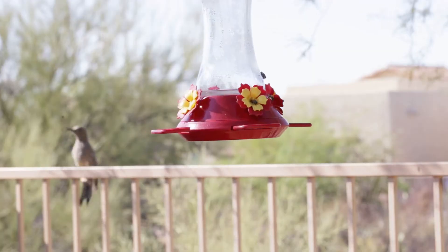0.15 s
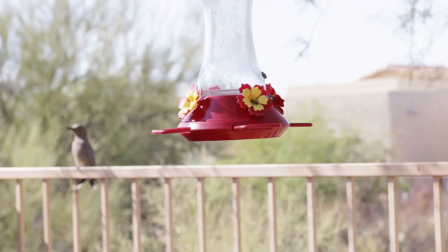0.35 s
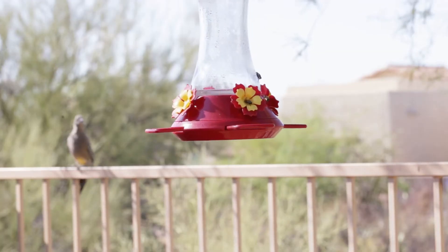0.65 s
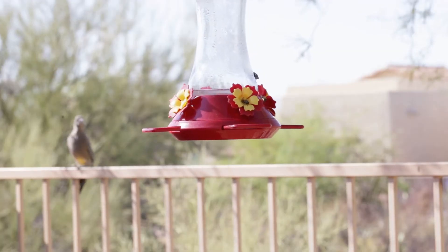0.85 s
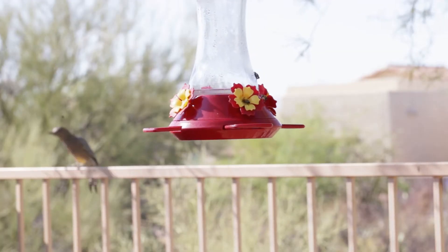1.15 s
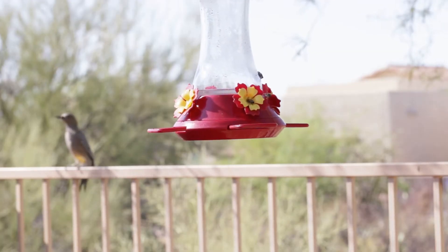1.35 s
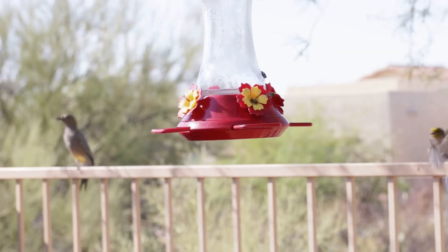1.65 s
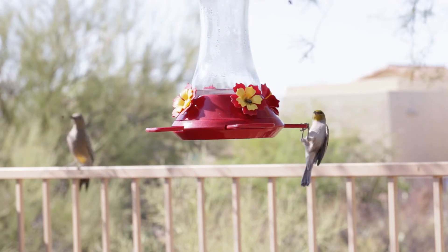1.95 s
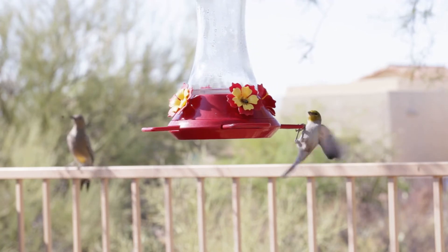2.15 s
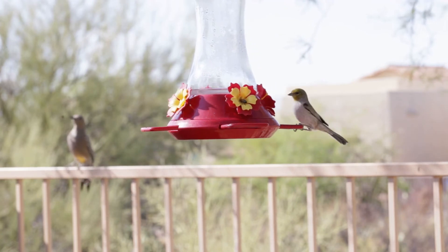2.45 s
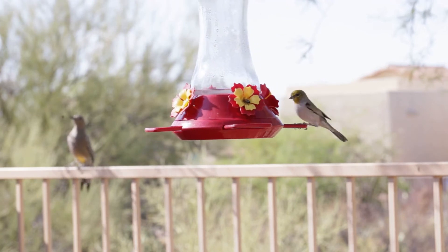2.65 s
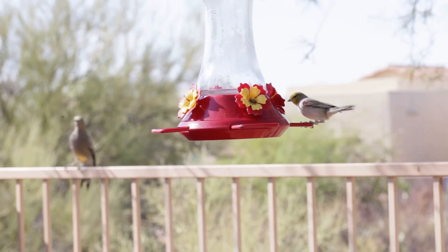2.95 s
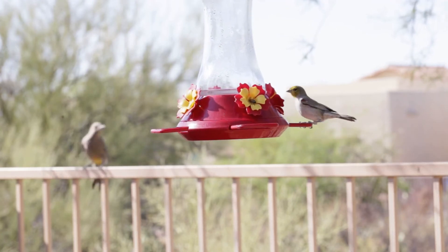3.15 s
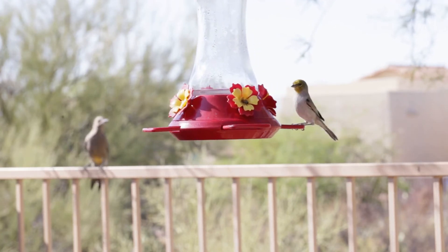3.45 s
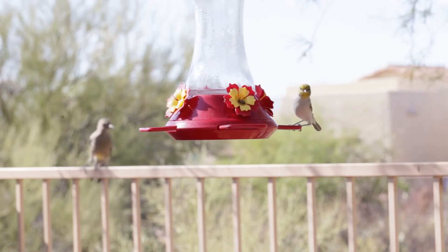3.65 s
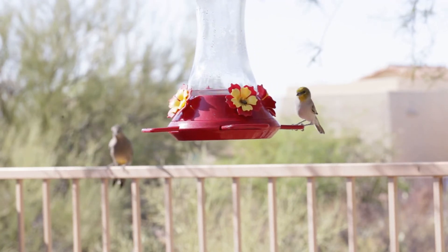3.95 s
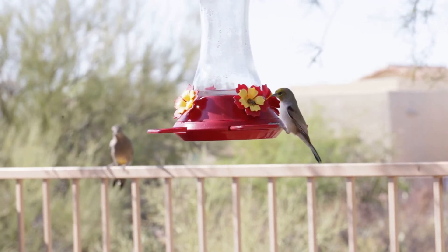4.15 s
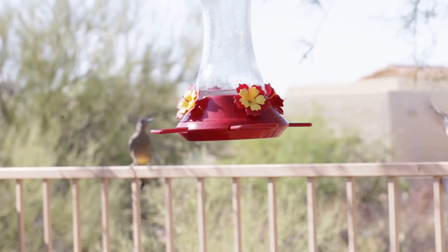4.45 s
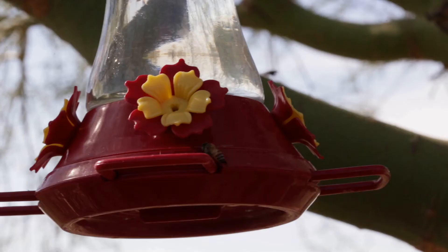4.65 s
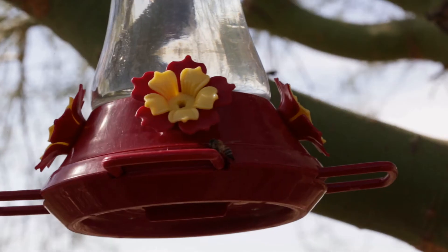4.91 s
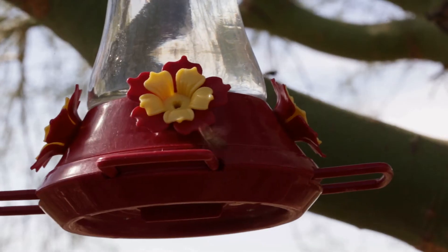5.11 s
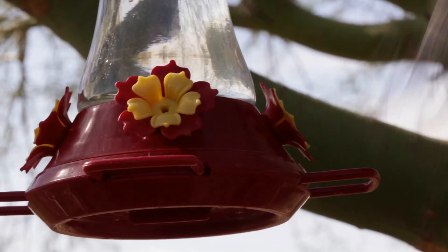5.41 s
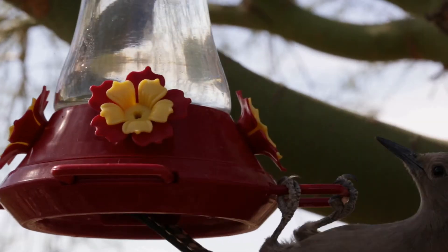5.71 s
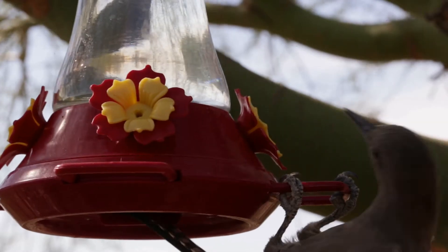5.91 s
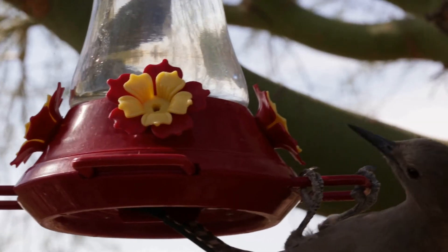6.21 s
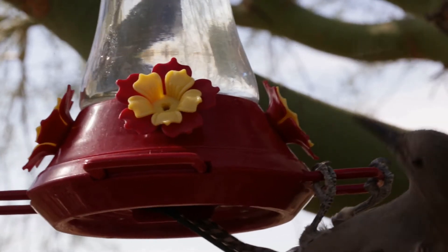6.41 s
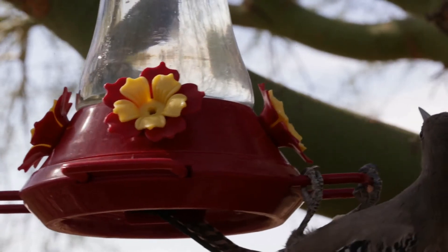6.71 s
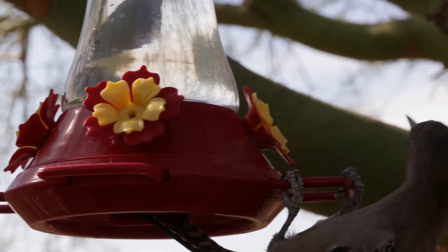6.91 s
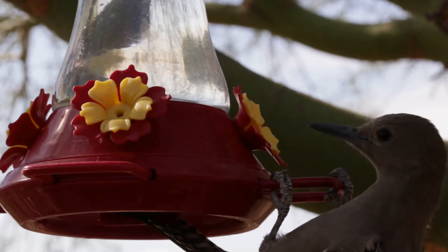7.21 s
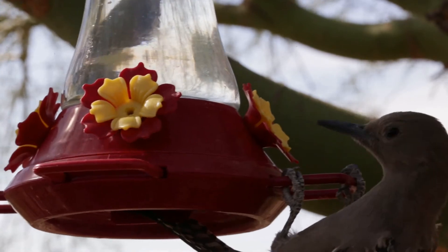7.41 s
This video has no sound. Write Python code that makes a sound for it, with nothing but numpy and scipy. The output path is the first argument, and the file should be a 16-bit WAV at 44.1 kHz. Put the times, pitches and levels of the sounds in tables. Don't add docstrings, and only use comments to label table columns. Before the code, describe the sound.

Outdoors in a suburban yard, a woodpecker gives nine even, piping yips at moderate distance with short wall echoes. Faint small-bird chips and tiny claw ticks follow, then six more yips, with a far dog barking twice. An abrupt scene change brings seven much louder, drier yips near the microphone, feeder knocks, a soft passing car and low wind thumps.

```python
import sys
import numpy as np
from scipy import signal
from scipy.fft import rfft, irfft
from scipy.io import wavfile
from scipy.ndimage import uniform_filter1d

SR = 44100
rng = np.random.default_rng(int(sys.argv[2]) if len(sys.argv) > 2 else 0)


def decibels_to_gain(level_db):
    exponent = np.asarray(level_db, float) / 20
    return 10 ** exponent


def to_wav(sig):
    pcm = np.clip(np.atleast_2d(sig), -1, 1) * 32767
    pcm = np.round(pcm).astype(np.int16)
    wavfile.write(sys.argv[1], SR, pcm.T)


N = 333837

# t/s, hold/s, fall/s, effort level/dB, held f/Hz
YIPS = [(.153, 0.079, 0.039, -28.5, 1473), (0.412, 0.075, 0.06, -28, 1474),
        (0.636, 0.079, 0.039, -26, 1412), (0.869, 0.07, 0.063, -28, 1348), (1.097, 0.073, 0.062, -29, 1354),
        (1.337, 0.075, 0.053, -29.5, 1316), (1.585, 0.073, 0.054, -29, 1355),
        (1.831, 0.069, 0.069, -28.5, 1378), (2.082, 0.076, .047, -31, 1326),
        (3.195, 0.062, 0.042, -28, 1420), (3.441, 0.072, 0.047, -27.5, 1384),
        (3.687, 0.074, 0.058, -29, 1394), (3.921, 0.078, 0.057, -28.5, 1438),
        (4.17, .072, .056, -28.5, 1446), (4.417, .073, .062, -29, 1449), (5.286, 0.073, 0.029, -18, 1521),
        (5.487, 0.089, 0.032, -19.5, 1492), (5.722, 0.077, 0.043, -18.5, 1453),
        (5.954, 0.073, 0.051, -17.5, 1493), (6.183, 0.072, 0.05, -18.5, 1452),
        (6.415, 0.073, 0.053, -19, 1462), (6.654, 0.079, 0.043, -19.5, 1480)]
# level of low harmonics/dB, level of high harmonics/dB
DELIVERIES = [(1, 1.5, 2.5, -7, 3.5), (2, 3.2, 2.1, -6, -1), (3.5, 0.9, -0.05, -9.5, -3),
              (3, 4, 1.5, -9, -1.5), (3.5, 2.2, -.4, -7.5, -2.5), (1.5, 2.3, 1.6, -7.5, -2.5),
              (2, 3.7, 0.5, -8, -5), (-0.5, 2.9, 1.3, -6, -1.5), (-1, 0.7, 0.9, -9.5, 2),
              (0.5, 4, -0.5, -8, 1), (0.5, 1.5, 3.5, -5.5, 0), (1.5, 2, 0.9, -4, 0.5),
              (0.5, -0.8, 2, -7, .3), (0, 5.5, 1.4, -10, -1.5), (3, 4.5, 1.5, -6, -0.5),
              (-8.5, -.8, 2.5, -10, -6), (7.5, 3.5, 2.2, -3.5, -6.5), (1.5, 3.5, 0.6, -6.5, -10.5),
              (1, 4.5, 0, -5, -7), (-0.5, .3, -0.4, -6, -8), (-0.5, 6, 0.5, -5, -4),
              (-5.1, .7, 0.1, -5, -6.5)]
TRACT_DB = [-17, 0.17, -2.5, -14, -21.5, -12, -28, -22, -26.5, -33.5, -48]
TURN_SHARE = [0.37, 0.43, 1, 0.34, 0.6, .3, .3, .3]
# delay t/s, level/dB
ECHOES = [
    (.004, -22.5),
    (0.012, -16.5),
    (.031, -18),
    (0.055, -19.5),
    (0.075, -28.5),
    (0.093, -24.5),
    (0.125, -32.5),
    (.16, -38),
]
# f/Hz, decay time t60/s
YARD_T60 = [(500, 0.16), (3000, 0.38), (6000, 0.22), (12000, 0.3)]
# f/Hz, level/dB
YARD_COLOUR = [(400, 6), (2800, -8.5), (3800, -2.5), (4600, -5.5), (9000, -11), (16000, -3.5)]
# t/s, length/s, first f/Hz, last f/Hz, level/dB
CHIPS = [
    (1.262, 0.016, 8200, 2700, -37.5),
    (1.268, 0.014, 8300, 5000, -48),
    (1.31, .015, 8300, 4500, -55),
]
# t/s, length/s, first f/Hz, last f/Hz, level/dB
FAR_CHIPS = [
    (2.87, .03, 4220, 5400, -63),
    (2.91, .035, 4200, 4070, -55.5),
    (2.93, 0.076, 4420, 4960, -63),
    (2.961, 0.044, 3540, 4170, -56),
    (2.996, 0.03, 4880, 5000, -68),
    (3.018, 0.04, 3980, 3580, -56),
    (3.05, 0.0253, 4800, 4440, -72),
    (6.87, 0.086, 5140, 4700, -71),
    (6.953, 0.052, 4480, 4420, -66),
    (7.327, 0.027, 5140, 4880, -65),
]
# t/s, knock level/dB, knock f/Hz, scratch level/dB
TICKS = [(.066, -40, 3520, -55), (0.334, -40.5, 3450, -51), (1.25, -40, 3370, -56),
         (2.216, -46, 3440, -51.5), (2.787, -41, 3100, -51), (2.983, -42, 3130, -49.5),
         (3.402, -40.5, 3330, -54), (3.821, -42, 3200, -49.5), (3.853, -39, 3200, -49),
         (4.605, -42, 3330, -51), (5.086, -66, 4200, -50.5), (5.105, -49.5, 4200, -42),
         (5.111, -49.5, 4120, -43), (5.278, -43, 4000, -59), (5.408, -49.5, 3400, -42),
         (5.43, -43, 3360, -48), (5.468, -55, 3400, -52), (5.627, -30, 2250, -33),
         (5.634, -51.5, 2300, -43.5), (6.177, -65, 4500, -53.5), (6.407, -53, 4500, -58),
         (6.645, -58.5, 4500, -67), (7.54, -31, 2350, -75), (7.565, -36.5, 2330, -68)]
# t/s, length/s, level/dB
RUSTLES = [
    (4.63, 0.023, -58.5),
    (4.665, 0.028, -59),
    (4.697, 0.02, -61),
    (5.128, 0.046, -59),
    (5.187, .05, -62),
    (5.39, 0.11, -52),
]
# f/Hz, level/dB
SCRATCH_COLOUR = [(1000, -20), (3000, -23), (6000, -10), (10000, -2), (16000, -10)]
# t/s, rise/s, peak level/dB, peak f/Hz
BARKS = [
    (3.87, .11, -39, 862),
    (4.11, .09, -37.5, 787),
]
BARK_HARMONICS_DB = [-2, -4, -11, -18]
# f/Hz, level/dB
TYRES = [(250, -42), (600, 4), (1000, 11.5), (1500, 0.5), (2400, -3.5), (3200, -25.5), (5000, -31),
         (9000, -65.5)]
# f/Hz, level per Hz/dB
HUM = [(12, -41), (20, -10), (74, -4), (113, 1.5), (233, -13), (317, -13.5), (345, -13.5), (1030, -12),
       (2060, -23.5), (2310, -14.5), (2880, -34.5), (3600, -26.5), (4900, -42), (15800, -37)]
# t/s, level/dB
HUM_DB = [(0, -52), (1.5, -53.5), (3.3, -55.5), (4.72, -54), (4.74, -49), (7.57, -47.5)]
# f/Hz, bandwidth/Hz, level/dB
COOLER = [
    (111.6, 22, -55.5),
    (233.3, 19.6, -59.5),
    (353, 9.7, -76.5),
    (2383, 34, -65.5),
    (3486, 59, -80),
]
# f/Hz, level/dB
SHADE = [(2500, 0), (3500, -4.5), (7000, -5.5), (11000, -3)]
# t/s, length/s, level/dB
PUFFS = [(0.245, 0.048, -40), (0.724, 0.034, -43.5), (2.32, 0.079, -39), (2.852, 0.088, -45),
         (6.359, 0.062, -41), (6.597, 0.05, -39), (6.67, 0.062, -35), (6.884, 0.099, -50),
         (6.979, 0.12, -45.5), (7.062, 0.17, -38), (7.199, 0.082, -26.5), (7.285, 0.059, -38),
         (7.35, 0.11, -31.5), (7.433, 0.09, -27.5), (7.493, 0.071, -28), (7.55, 0.051, -28)]
# f/Hz, level/dB
BUFFET_COLOUR = [(15, -19), (45, 2), (110, 5.5), (220, -5), (400, -34.0), (1000, -75)]
# f/Hz, side level re mid/dB
SIDE_DB = [(60, -41), (110, -49.5), (200, -45), (380, -41.5), (700, -43), (1290, -43), (2380, -45.5),
           (4400, -36), (8120, -29.5), (15000, -24)]
# t/s, level/dB
CUT = [
    (4.727, 6.5),
    (4.729, -52),
    (4.734, -52),
    (4.736, 4),
]

EARLIER_YIP_S = -0.033
NEAR_S, NEAR_WET_DB = 4.73, -12.5
YARD_DB = -14

ATTACK_S, ATTACK_DB = 0.0064, -24
SCOOP, SCOOP_S = .15, 0.00555
SLACK_HZ = 571
FALL_BEND, FALL_DB, FALL_STRETCH = (3.3, 2.4), (-25.5, -21), (0.84, 1.08)
KNEE_S, FALL_SOON = .01, 0.86
SAG_AT, SAG_WIDTH = .5, .17
SAG_DB = -1.7
SHUT_HZ, SHUT_DB = 4500, -7
TRACT_FOLLOW = (0.62, 0.69)
HOARSE_FALL, JITTER_FALL = (.5, .2), (.04, .022)
LEAD_DB, LEAD_S = 6, 0.0077
FALL_DIM_DB = -10.5

BLUR, FAR_BLUR = 0.45, 0.96
BARK_RISE_DB, BARK_FADE_DB, BARK_FADE_S, BARK_TAIL_S, BARK_SCOOP = -16, -17.5, 0.061, .14, 0.23
CAR_PASS_S, CAR_DB = 7.21, -44.5
CAR_NEAR_S = (0.15, 0.22)
HUM_TRIM_DB = 1


def yip(s, hold, fall, level_db, held, swell_db, climb, sag, low_db, high_db):
    near = int(s > NEAR_S)
    fall = fall * FALL_STRETCH[near]
    t = np.arange(0, hold + fall + 0.011, 1 / SR)
    effort_db, hz = effort_and_pitch(t, hold, fall, level_db, held, swell_db, climb, sag, near)
    slack = np.clip(1 - hz / held, 0, 1)
    onset_hoarse = 1.33 * np.exp(-t / 0.0036)
    hoarse = 0.00054 + HOARSE_FALL[near] * np.clip(slack - .03, 0, .3) + onset_hoarse

    jitter = (0.0051 + JITTER_FALL[near] * slack) * wobble(len(t), 249) + 0.0021 * wobble(len(t), 66)
    phase = 2 * np.pi * np.cumsum(hz * (1 + jitter)) / SR

    under, first, second, *upper = TRACT_DB
    turned_upper = upper + high_db * np.array(TURN_SHARE)
    tract_db = [under, first + low_db, second + low_db, 0, *turned_upper]
    tract = list(zip(held * np.array([.4, *range(1, 11), 12]), tract_db))

    thinning = np.sin(np.pi * np.clip(slack / 0.59, 0, 1)) * (t > hold / 2) / 2
    fundamental_db = LEAD_DB * np.exp(-t / LEAD_S) + FALL_DIM_DB * thinning
    voice = np.zeros(len(t))
    for k in range(1, 25):
        tract_hz = k * hz * (held / hz) ** TRACT_FOLLOW[near]
        gain_db = read(tract, tract_hz) + (k == 1) * fundamental_db
        gain_db += (0.95 + 0.43 * k) * wobble(len(t), 76)
        gain_db += SHUT_DB * slack * np.log2(np.maximum(k * hz / SHUT_HZ, 1))
        clear = np.exp(-abs(hoarse) * k ** 2.08 / 3)
        breath = np.sqrt(1 - clear ** 2) * wobble(len(t), 1500)
        angle = k * phase - 1.2 * k ** 1.5
        harmonic = clear * np.cos(angle) + breath * np.sin(angle)
        voice += decibels_to_gain(gain_db) * (k * hz < 16000) * harmonic
    return decibels_to_gain(effort_db) * voice / np.sqrt(uniform_filter1d(voice ** 2, 400))


def effort_and_pitch(t, hold, fall, level_db, held, swell_db, climb, sag, near):
    across = np.minimum(t / hold, 1) - .5
    down = np.clip((t - hold) / fall, 0, 1)
    down = uniform_filter1d(down, round(KNEE_S * SR), mode="nearest")
    dip = sag * np.exp(-((t / hold - SAG_AT) / SAG_WIDTH) ** 2)

    effort_db = level_db + ATTACK_DB * np.exp(-t / ATTACK_S) + swell_db * across + SAG_DB * dip
    effort_db += FALL_DB[near] * abs(down) ** FALL_SOON
    effort_db += 0.95 * wobble(len(t), 120)
    effort_db -= 1500 * np.maximum(t - hold - fall, 0)

    scoop = SCOOP * np.exp(-t / SCOOP_S)
    tense = held * (1 - scoop + (climb * across + sag / 3 - dip) / 100)
    hz = SLACK_HZ + (tense - SLACK_HZ) * abs(1 - down) ** FALL_BEND[near]
    return effort_db, uniform_filter1d(hz, 220, mode="nearest")


def birds():
    lead = SR // 4
    direct = np.zeros(N + lead)
    add(direct, lead / SR + EARLIER_YIP_S - .1, yip(*YIPS[0], *DELIVERIES[0]))
    for row, delivery in zip(YIPS, DELIVERIES):
        add(direct, row[0] + lead / SR, yip(*row, *delivery))
    for notes, blur in (CHIPS, BLUR), (FAR_CHIPS, FAR_BLUR):
        for s, *note in notes:
            add(direct, s + lead / SR, chip(*note, blur))
    near = np.arange(N + lead) > lead + NEAR_S * SR
    reflected = yard(direct * decibels_to_gain(NEAR_WET_DB * near))[:N + lead]
    return (direct + reflected)[lead:]


def yard(x):
    taps = np.zeros(SR // 2)
    at = np.arange(400, len(taps) - 20, 20)
    taps[at + rng.integers(0, 20, len(at))] = rng.choice([-1., 1.], len(at))
    hz, t, z = signal.stft(taps, SR, nperseg=256)
    t60 = np.clip(read(YARD_T60, hz), .03, 1)[:, None]
    tail = signal.istft(z * decibels_to_gain(-60 * t / t60), SR, nperseg=256)[1]
    tail *= decibels_to_gain(YARD_DB) / np.linalg.norm(tail)
    for s, db in ECHOES:
        rough_wall = evened(rng.standard_normal(60)) / np.sqrt(60)
        add(tail, s, decibels_to_gain(db) * rough_wall)
    return colour(signal.fftconvolve(x, tail), YARD_COLOUR)


def chip(length, first_hz, last_hz, db, blur):
    u = np.linspace(0, 1, round(length * SR))
    glide = first_hz + (last_hz - first_hz) * u ** 1.5
    note = np.sin(np.pi * u) ** 0.52 * np.sin(2 * np.pi * np.cumsum(glide) / SR)
    note *= 1 - blur + blur * wobble(len(u), 890)
    smear = rng.standard_normal(3000) * decibels_to_gain(-60 * np.arange(3000) / SR / 0.098)
    smear *= 0.73 * blur / np.linalg.norm(smear)
    smear[0] = 1 - np.clip(blur, 0, 1) ** 2
    return decibels_to_gain(db + 2.5) * signal.fftconvolve(note, smear)


def ticks():
    knocks, scratches = np.zeros(N), np.zeros(N)
    t = np.arange(800) / SR
    for s, knock_db, hz, scratch_db in TICKS:
        mode = resonate(resonate(rng.standard_normal(len(t)), hz, 1300), hz, 1300)
        add(knocks, s, decibels_to_gain(knock_db - 60 * t / 0.01) * evened(mode))
        add(scratches, s, decibels_to_gain(scratch_db + 2.0 - 60 * t / 0.017) * rng.standard_normal(len(t)))
    return knocks + colour(scratches, SCRATCH_COLOUR)


def rustles():
    out = np.zeros(N)
    for s, length, db in RUSTLES:
        shape = np.hanning(round(length * SR))
        level = decibels_to_gain(db + 3.1 * wobble(len(shape), 300))
        add(out, s, level * shape * rng.standard_normal(len(shape)))
    return colour(out, SCRATCH_COLOUR)


def dog():
    out = np.zeros(N)
    for s, rise, peak_db, top_hz in BARKS:
        t = np.arange(-rise, BARK_TAIL_S, 1 / SR)
        before = np.maximum(-t / rise, 0)
        fade = 1 - np.exp(-np.maximum(t, 0) / BARK_FADE_S)
        effort_db = peak_db + BARK_RISE_DB * before + BARK_FADE_DB * fade
        hz = top_hz * (1 - BARK_SCOOP * before ** 2) * (1 + 0.03 * wobble(len(t), 160))
        phase = 2 * np.pi * np.cumsum(hz) / SR
        voice = np.zeros(len(t))
        for k, db in enumerate(BARK_HARMONICS_DB, 1):
            voice += decibels_to_gain(db) * (1 + 0.67 * wobble(len(t), 185)) * np.cos(k * phase)
        add(out, s, decibels_to_gain(effort_db) * voice)
    return out


def car():
    tyres = evened(colour(rng.standard_normal(N), TYRES))
    return tyres * decibels_to_gain(car_db() + 1.7 * wobble(N, 23))


def car_db():
    late = np.arange(N) / SR - CAR_PASS_S
    relative_distance = late / np.where(late < 0, *CAR_NEAR_S)
    return CAR_DB - 15 * np.log10(1 + relative_distance ** 2)


def suburb():
    bed = hum() * decibels_to_gain(along(HUM_DB) + HUM_TRIM_DB) + cooler()
    return np.where(np.arange(N) < NEAR_S * SR, bed, colour(bed, SHADE))


def hum():
    hz, t, z = signal.stft(rng.standard_normal(N + 1024), SR, nperseg=1024, noverlap=768)
    patches = uniform_filter1d(uniform_filter1d(rng.standard_normal(z.shape), 10, 0), 10, 1)
    z = z * decibels_to_gain(read(HUM, hz)[:, None] + 1.16 * evened(patches))
    return evened(signal.istft(z, SR, nperseg=1024, noverlap=768)[1][:N])


def cooler():
    out = np.zeros(N)
    for hz, width, db in COOLER:
        out += decibels_to_gain(db) * evened(resonate(rng.standard_normal(N), hz, width))
    return out


def wind():
    level = np.zeros(N)
    for s, length, db in PUFFS:
        u = np.linspace(0, 1, round(length * SR))
        add(level, s, decibels_to_gain(db - 4.5) * np.sin(np.pi * u ** 0.9) ** 2)
    rumble = colour(rng.standard_normal(N), BUFFET_COLOUR)
    return level * rumble / np.sqrt(uniform_filter1d(rumble ** 2, 1500))


def evened(x):
    return x / np.sqrt(np.mean(x ** 2) + 1e-20)


def read(points, hz):
    f, value = np.transpose(points)
    return np.interp(np.log(hz + 1), np.log(f + 1), value)


def along(points):
    return np.interp(np.arange(N) / SR, *np.transpose(points))


def add(mix, s, sound):
    at = round(s * SR)
    sound = sound[max(-at, 0):]
    part = mix[max(at, 0):][:len(sound)]
    part += sound[:len(part)]


def colour(x, spectrum):
    response = decibels_to_gain(read(spectrum, np.fft.rfftfreq(len(x), 1 / SR)))
    return irfft(rfft(x) * response, len(x))


def wobble(count, hz):
    width = max(int(SR / hz), 1)
    return evened(uniform_filter1d(uniform_filter1d(rng.standard_normal(count), width), width))


def resonate(x, hz, width):
    r = np.exp(-np.pi * width / SR)
    return 2 * signal.lfilter([1 - r], [1, -r * np.exp(2j * np.pi * hz / SR)], x).real


def scene():
    mid = birds() + ticks() + rustles() + dog() + car() + suburb() + wind()
    side = decibels_to_gain(6.0) * colour(mid * wobble(N, 34), SIDE_DB)
    return np.array([mid + side, mid - side])


def low_pass(x):
    return signal.sosfilt(signal.butter(12, 15980, fs=SR, output="sos"), x)


def record(dry):
    mix = dry * decibels_to_gain(along(CUT))
    return low_pass(mix)


dry = scene()
out = record(dry)
to_wav(out)
```